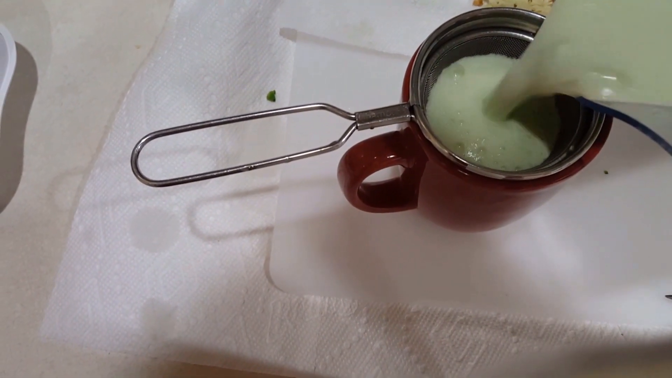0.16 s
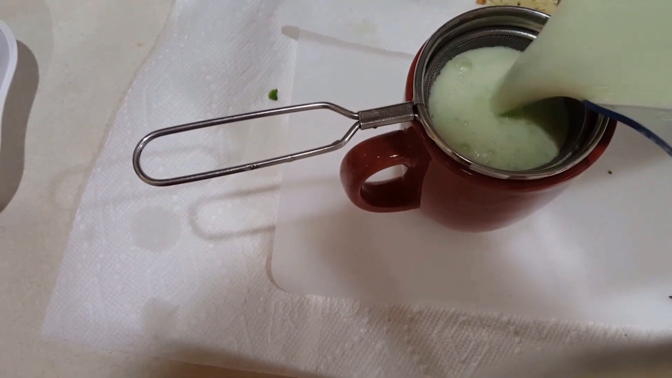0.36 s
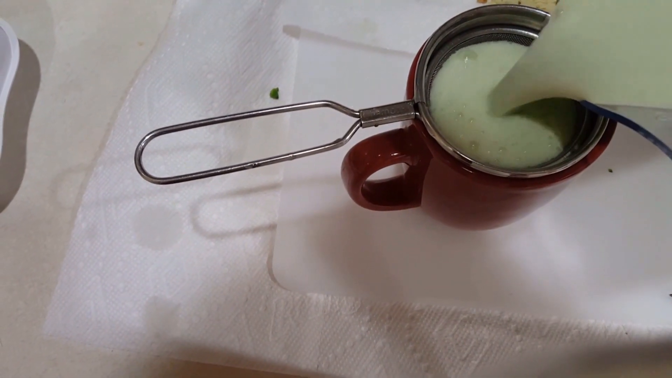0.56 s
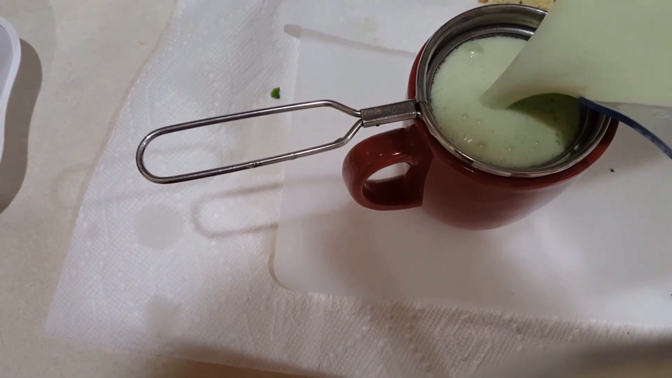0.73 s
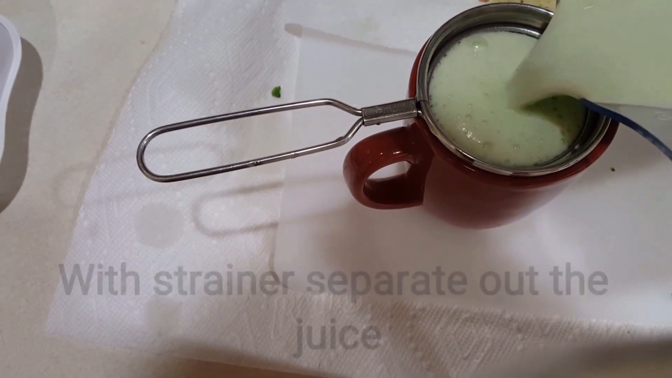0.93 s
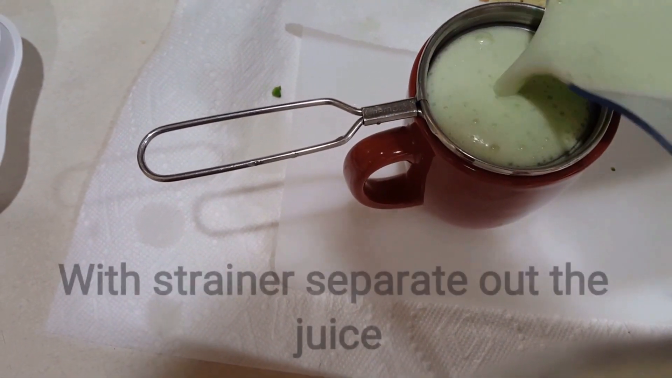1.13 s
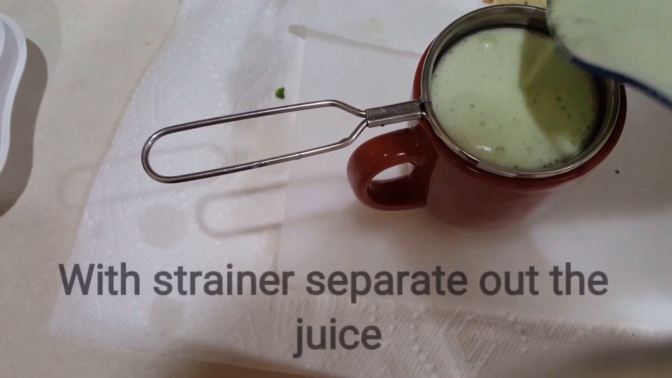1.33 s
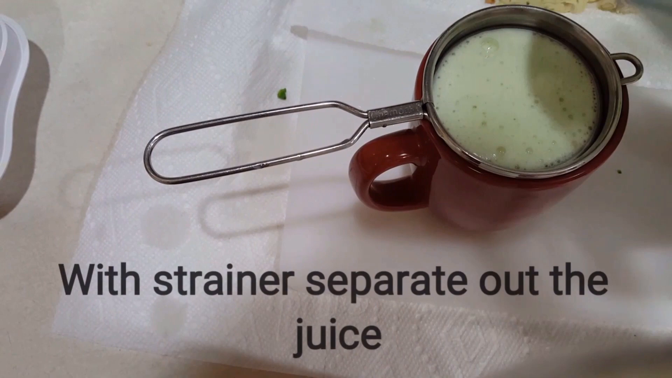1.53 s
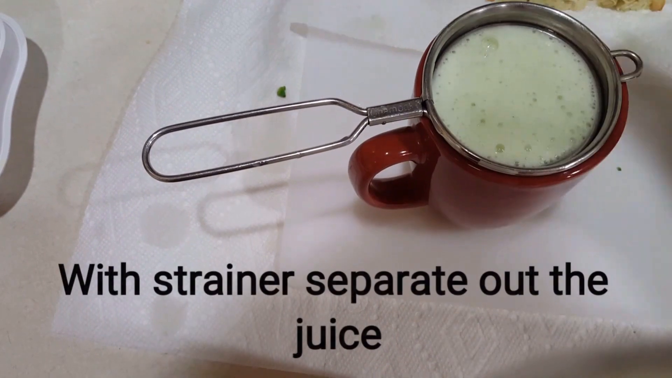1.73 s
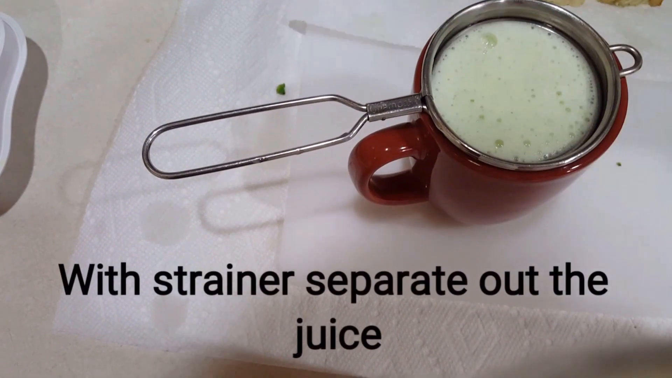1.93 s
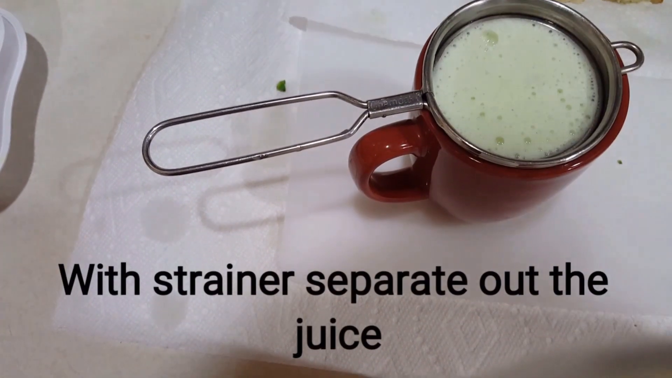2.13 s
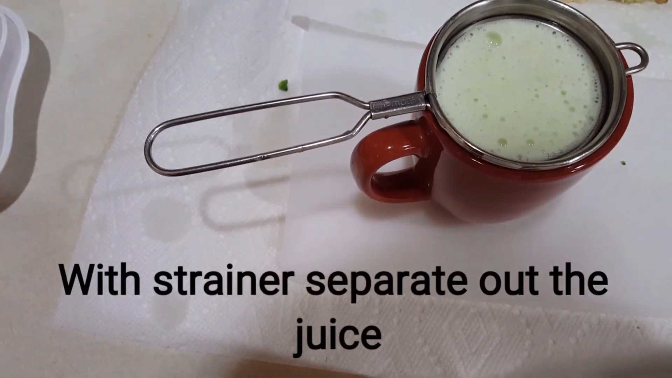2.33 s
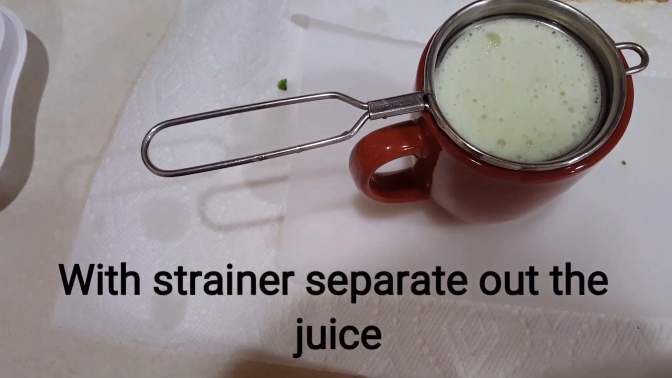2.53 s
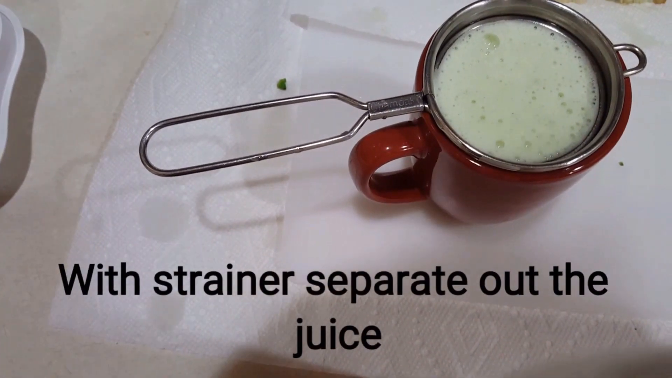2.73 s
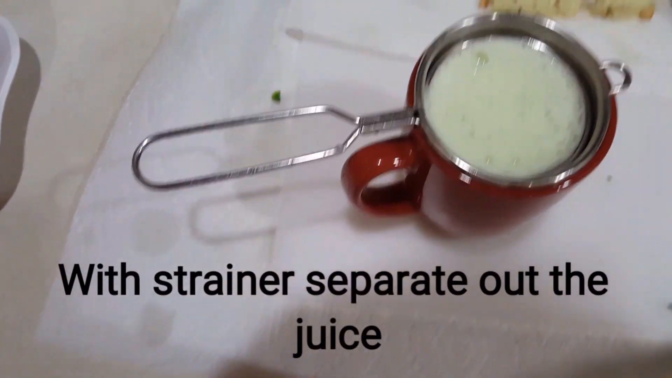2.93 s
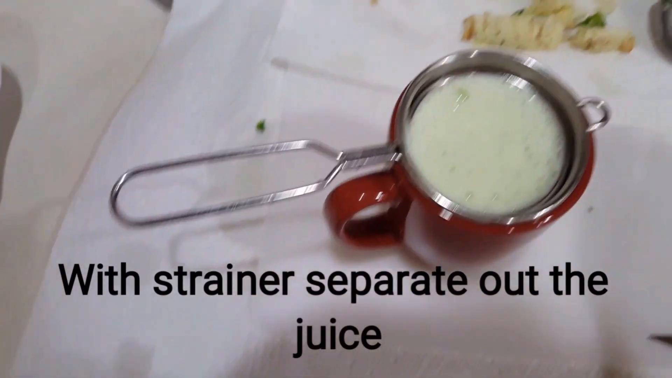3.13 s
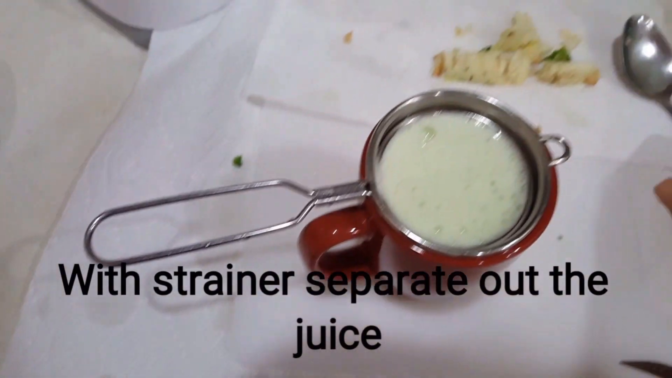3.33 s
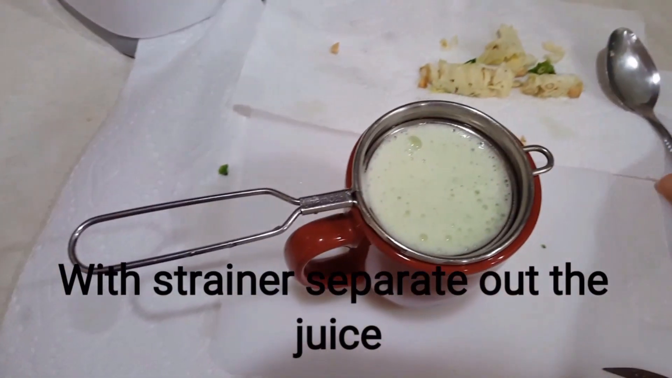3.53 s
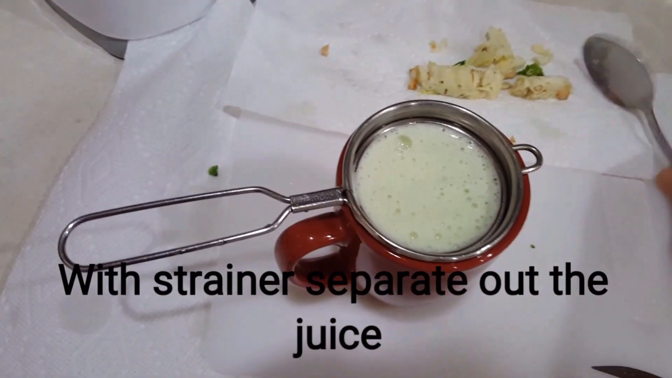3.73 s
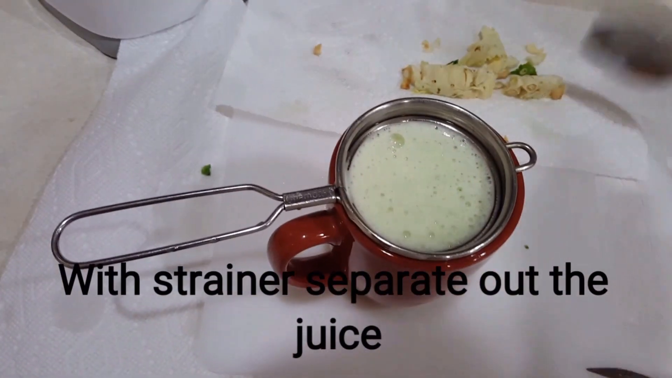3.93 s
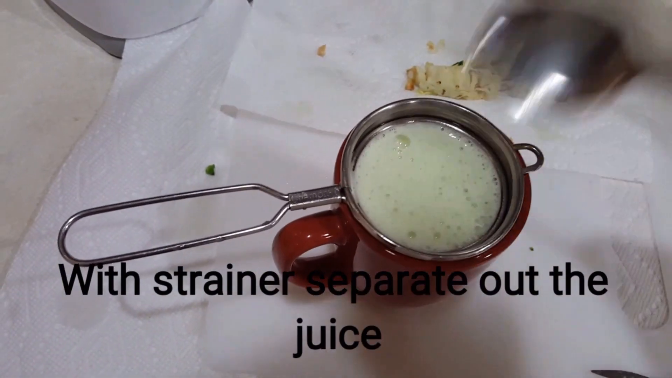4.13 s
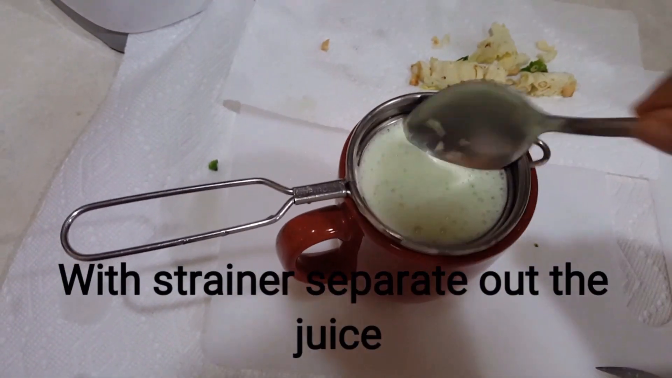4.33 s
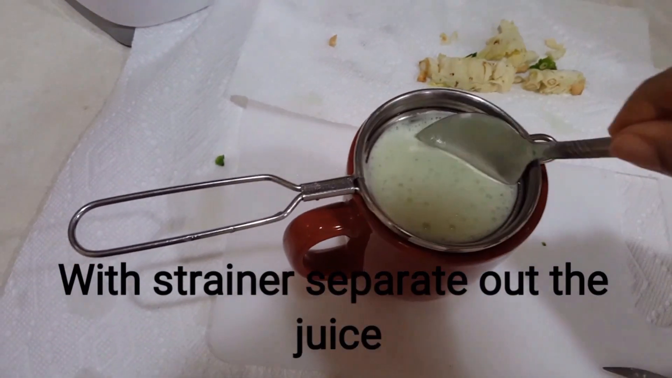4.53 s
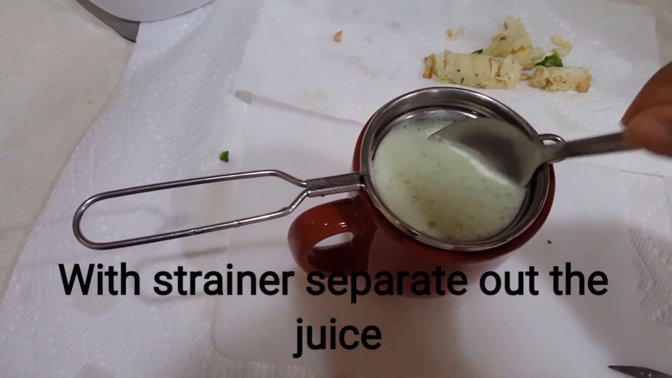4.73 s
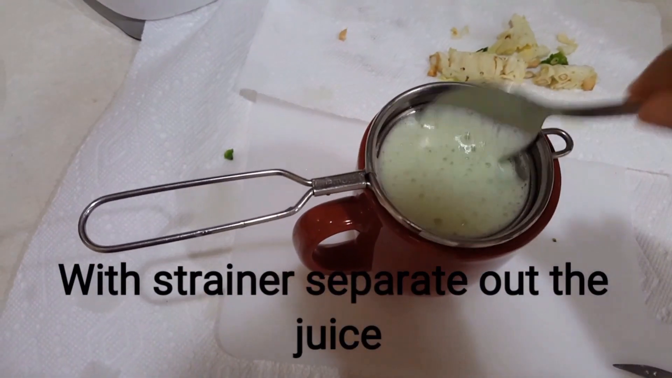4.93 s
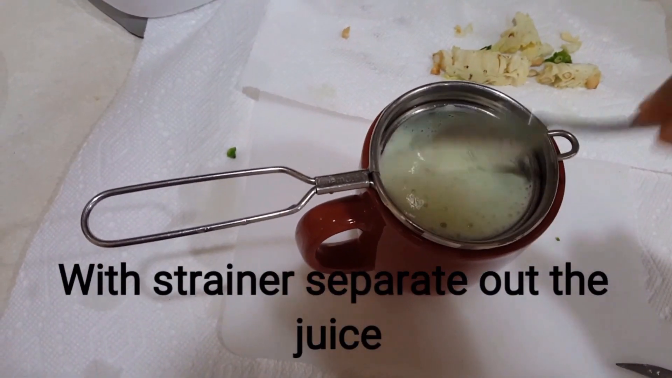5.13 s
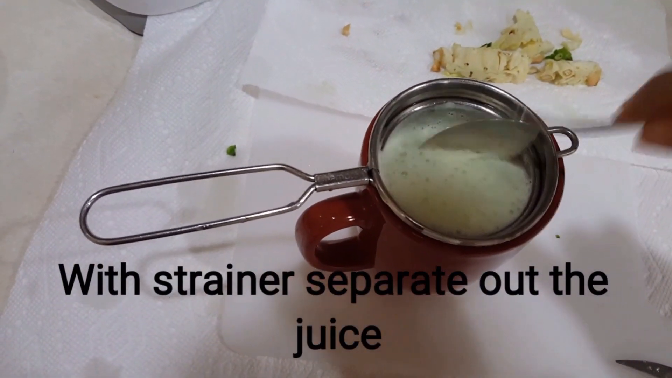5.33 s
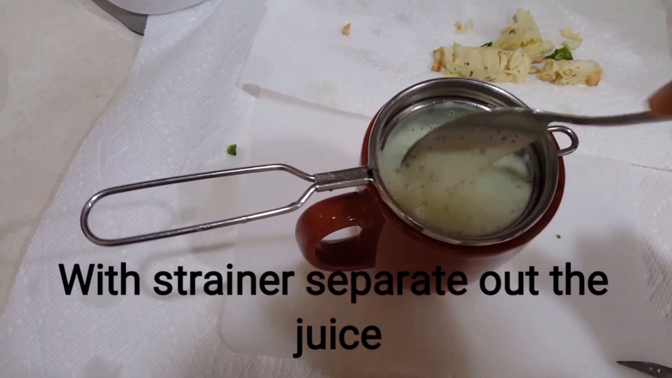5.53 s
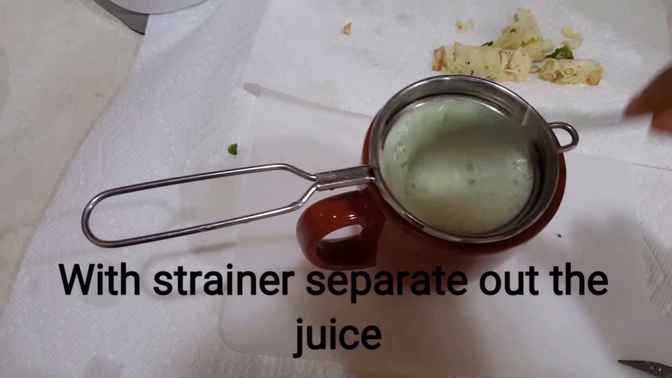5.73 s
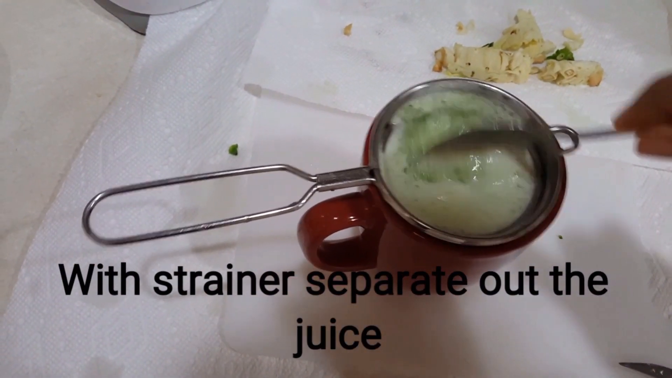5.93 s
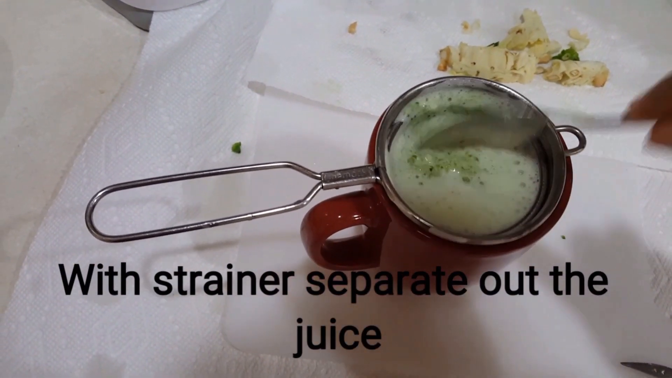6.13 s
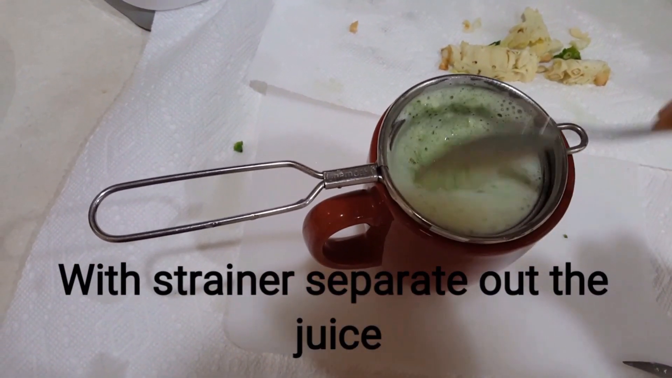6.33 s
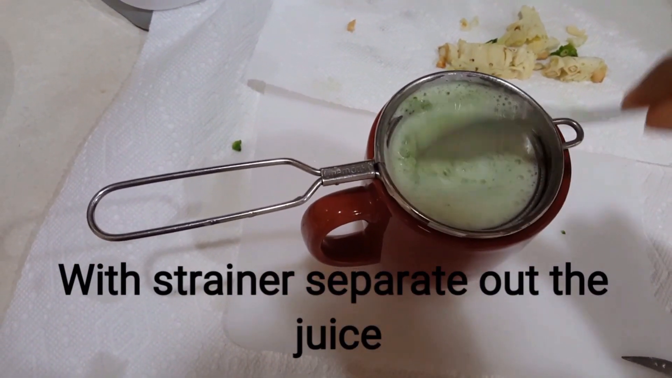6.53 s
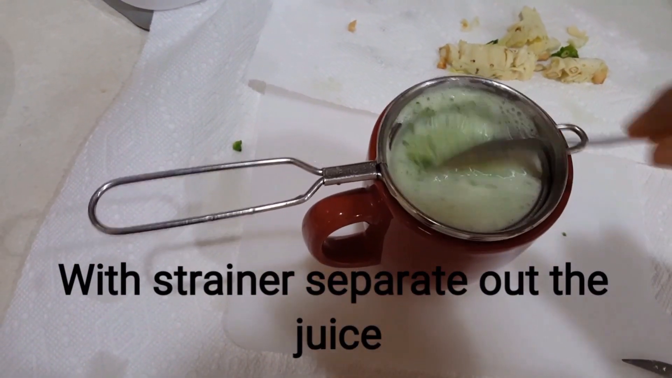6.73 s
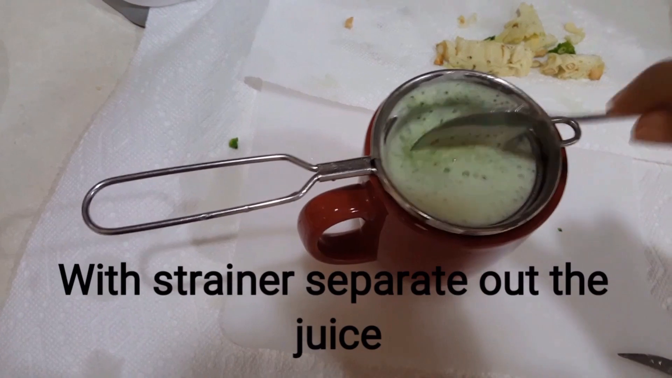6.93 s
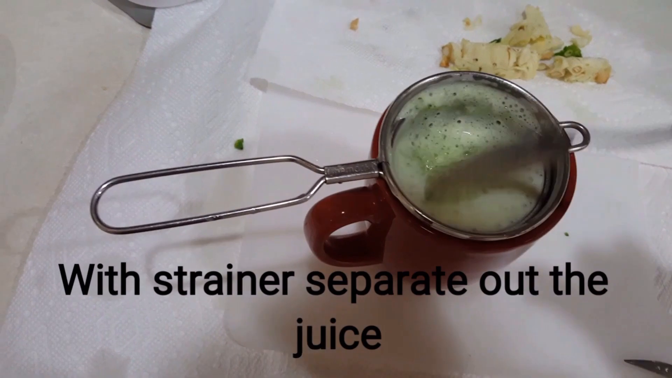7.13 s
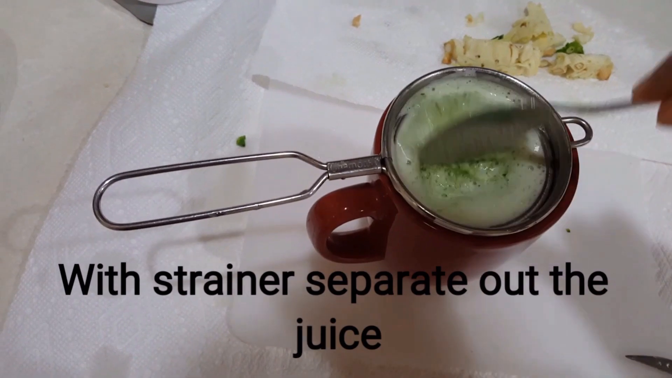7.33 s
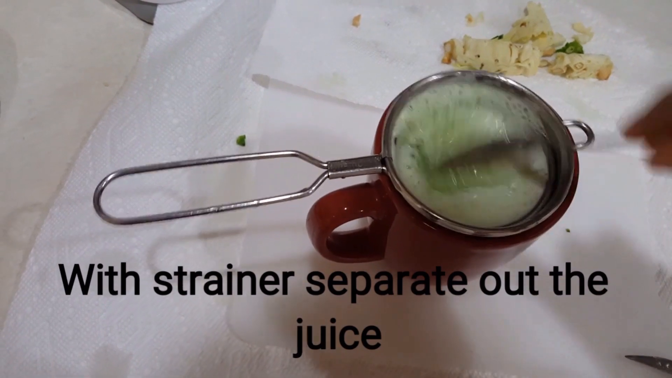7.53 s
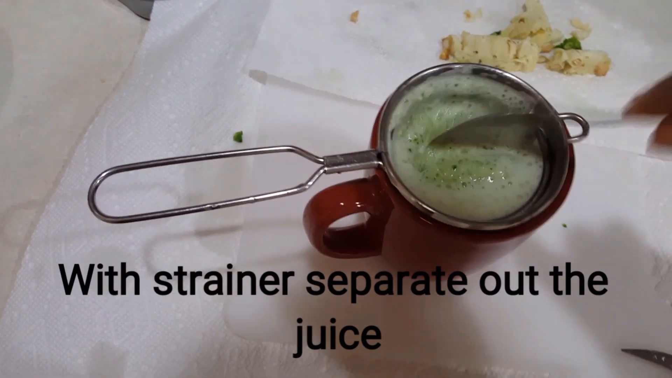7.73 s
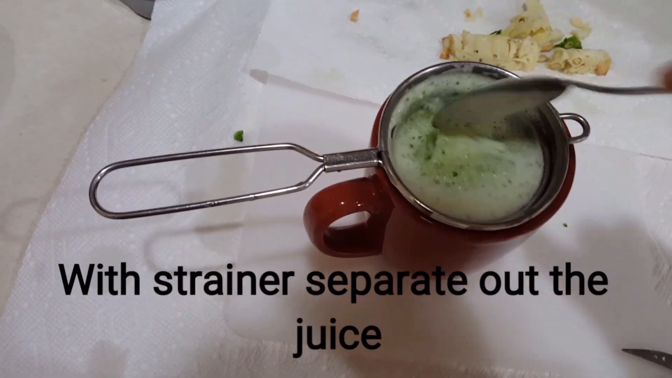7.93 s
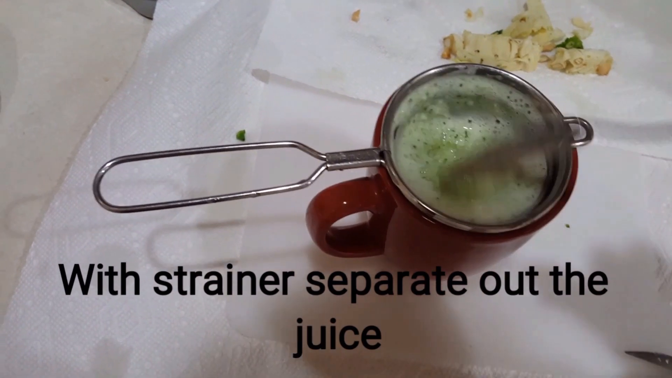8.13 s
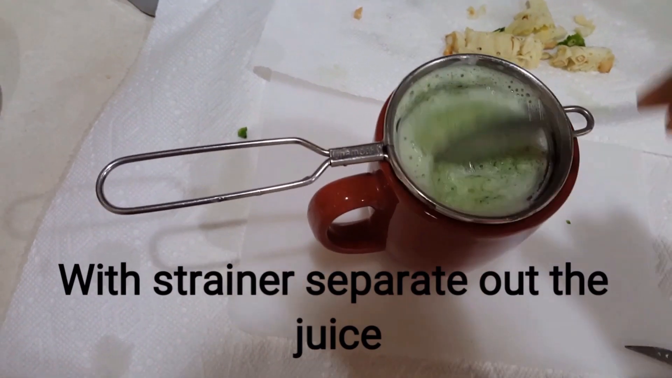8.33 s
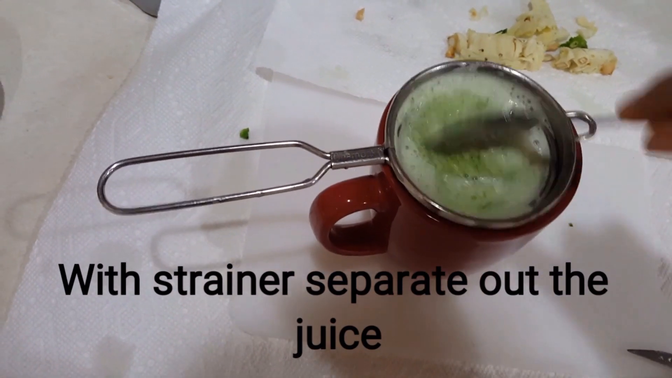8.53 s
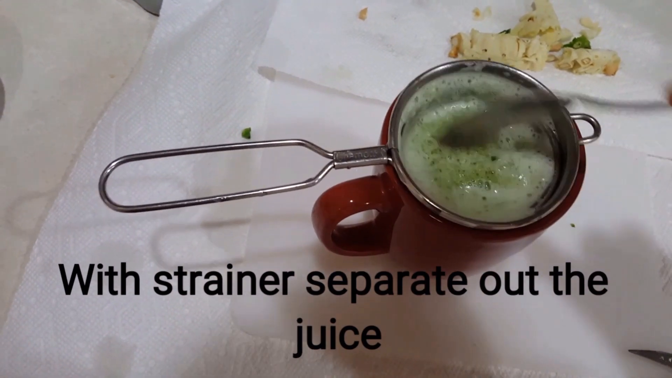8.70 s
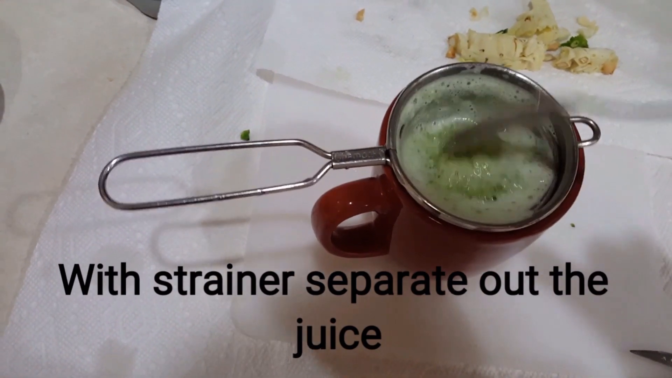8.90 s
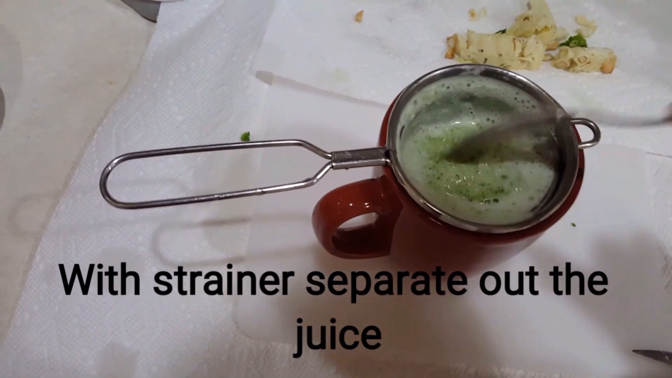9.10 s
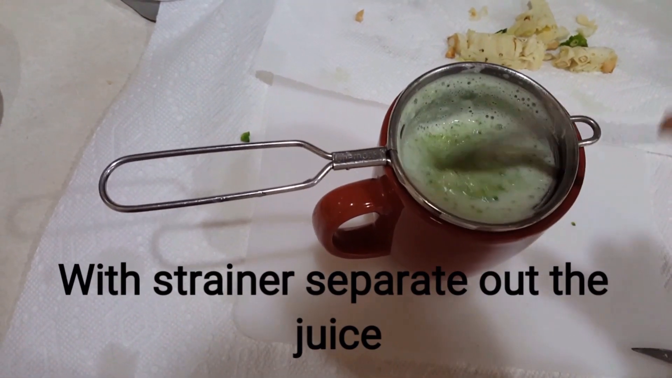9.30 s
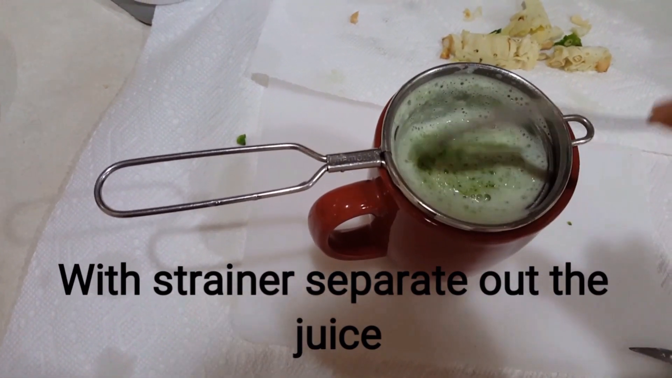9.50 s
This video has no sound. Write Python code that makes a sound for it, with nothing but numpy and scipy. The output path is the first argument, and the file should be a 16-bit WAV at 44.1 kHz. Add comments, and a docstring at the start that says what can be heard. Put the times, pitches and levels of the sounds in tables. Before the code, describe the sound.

Faint wet pouring, a dull double thud, small clinks, then a metal spoon knocks and scrapes rapidly on a wire strainer over a low hum.

```python
"""A spoon works green pulp through a wire strainer on a mug: each stab rings the wires as fading tones,
knocks the basket and shakes the table; between stabs the edge drags over the mesh as a run of tiny plucks.
Before that, pulp pours in as a soft hiss, the jug lands with a thud, paper towel rustles and the spoon
clinks as it is picked up. Air pops in the pulp as short rising tones; a fan motor hums in the small kitchen."""
import sys
import numpy as np
from scipy import signal
from scipy.fft import rfft, irfft, next_fast_len
from scipy.io import wavfile
from scipy.ndimage import uniform_filter1d

SR = 44100
rng = np.random.default_rng(int(sys.argv[2]) if len(sys.argv) > 2 else 0)


def transcribe(u):
    """Save the signal u as a 16-bit wav file named by the first command-line argument.

    u: samples, shape (n,) or (channels, n), limited to [-1, 1]; the rate is SR.
    q: integer samples, one column per channel.
    """
    v = np.clip(np.atleast_2d(u).T, -1, 1)
    q = np.round(v * 32767).astype(np.int16)
    wavfile.write(sys.argv[1], SR, q)


N = 426006
T = np.arange(SR // 2) / SR  # half a second of time [s], long enough for one contact
ATTACK = int(.012 * SR)  # the first 12 ms of a sound [samples], where its level is set

# In all tables, levels are settings that the functions may shift; decay is the time to fall by 60 dB. tones of
# the strainer wires, and above about 6 kHz the ring of the spoon: (frequency [Hz], level [dB], decay [s])
WIRES = [(1048, -14.5, 0.036), (1392, -9, 0.03), (1770, -30, 0.11), (2080, -5.5, 0.1), (2260, 11.5, 0.043),
         (2377, -9.5, 0.068), (2657, 2.5, 0.028), (2830, 1, 0.029), (2950, 2, 0.042), (3740, -12.5, 0.11),
         (4400, -5, 0.046), (4400, -35, 0.3), (5520, -12, 0.066), (5454, 6, 0.028), (6520, -9, 0.24),
         (9100, -45, .1), (8800, -26, 0.1), (10200, -8, 0.085), (12300, -17, 0.044)]
# tones of the table under the mug: (frequency [Hz], level [dB], decay [s])
TABLE = [(106, 6.5, 0.37), (114.77, 10, 0.41), (127, -1, 0.35)]
# spectrum of the contact noise of the mesh: (frequency [Hz], level [dB])
CRACK = [(700, -31), (1300, -14), (1800, 4.5), (2500, 5), (3100, 5), (3600, -9.5), (5500, -10.5),
         (7000, -8), (15000, -53)]
# spectrum of a sharp, bright contact: (frequency [Hz], level [dB])
TICK = [(1000, -43), (4000, 12.5), (6500, 4.5), (10000, 7.5), (11500, 2), (13500, 4), (15000, -9)]
# spectrum of slapped wet pulp: (frequency [Hz], level [dB])
SLAP = [(150, -17), (260, -20), (520, 0), (780, -16.5), (1060, 4), (1220, -5), (1400, -6), (1750, 0.5),
        (2300, -7.5), (6000, -32)]


def undb(db):
    """Turn decibels into gain."""
    return 10 ** (np.asarray(db) / 20)


def noise(size):
    """White noise."""
    return rng.standard_normal(size)


def fade(t60):
    """Exponential decay that falls by 60 dB in t60 seconds, over half a second."""
    return np.exp(-np.log(1000) * T / max(t60, 1e-3))


def along(points, size):
    """Read a table of (frequency [Hz], value) at the frequencies of a Fourier transform."""
    hz, value = np.transpose(points)[:2]
    return np.interp(np.log(np.fft.rfftfreq(size, 1 / SR) + 1), np.log(hz), value)


def colour(x, points):
    """Shape x by a spectrum of (frequency [Hz], level [dB]) and bring its rms to 1."""
    length = x.shape[-1]
    size = next_fast_len(length)
    spectrum = rfft(x, size) * undb(along(points, size))
    y = irfft(spectrum, size)[..., :length]
    return y / y.std()


def level(x, db, size=ATTACK):
    middle = x.mean(axis=0)[:size]
    return x * undb(db) / np.sqrt(np.mean(middle ** 2) + 1e-18)


def add(out, s, x):
    """Mix x in at time s."""
    i = int(s * SR)
    out[:, i:i + x.shape[1]] += x[:, :N - i]


def walk(rate):
    """Slow random drift with a spread a little under 1, heading for a new value rate times a second."""
    k = int(SR / rate)
    steps = np.repeat(noise(N // k + 1), k)
    return uniform_filter1d(steps, k)[:N]


def ringing(modes, drift=0):
    """Each tone swings and dies away, as a complex wave; drift detunes it a little at random."""
    tones = []
    for hz, db, t60 in modes:
        # pulp and spoon pressure detune the tones
        tuned_hz = hz + drift * np.sqrt(hz / t60) * rng.standard_normal()
        tones.append(undb(db) * fade(t60) * np.exp(2j * np.pi * tuned_hz * T))
    return np.array(tones)


def strike(body, scatter_db, spread):
    """Each contact point weights the tones anew; they reach left and right in slightly different phase."""
    weight, sign, left, right = noise((4, len(body)))
    gain = np.sign(sign) * undb(scatter_db * np.tanh(weight))
    swing = gain * np.exp(1j * spread * np.array([left, right]))
    return (swing @ body).real


def burst(points, t60, width):
    """Short contact noise that dies away; width sets how much of it differs left and right."""
    size = SR // 10
    hiss = colour(noise(size) + width * noise((2, size)), points)
    return hiss * fade(t60)[:size]


def soft(x, push):
    """A contact that lasts push seconds leaves out the treble."""
    press = signal.windows.hann(int(max(push, 1e-4) * SR) + 3)
    return signal.fftconvolve(x, press[None])[:, :x.shape[1]]


def chatter(x, span, follow, count=3):
    """The edge skips over a few more wires within span seconds of landing."""
    out = x.copy()
    for lag, size in rng.random((count, 2)):
        k = 1 + int(lag * span * SR)
        out[:, k:] += follow * size * x[:, :-k]
    return out


def thump(table, db):
    """The table takes a few cycles to get going under the mug."""
    shake = strike(table, scatter_db=5.5, spread=0.074) * (1 - fade(0.047))
    return level(shake, db, size=4 * ATTACK)


def fan():
    """The motor hums in steady tones that waver, with two breathy tones made by random drift."""
    # fan and mains tones: (frequency [Hz], level [dB], waver [share of the tone])
    hum_lines = [(44, -62, 0.036), (96, -60, .08), (120.4, -43, 0.01), (143, -55.5, 0.044),
                 (170, -62.5, 0.17), (200, -66.5, 0.34), (224, -74.5, 0.18), (460, -88.5, 0.39),
                 (467, -74.5, 0.76), (2730, -75, 0.32)]
    # breathy tones: (frequency [Hz], drift rate [Hz], level [dB])
    breathy = [(1352, 45, -76), (2710, 77, -80.5)]
    t = np.arange(N) / SR
    out = np.zeros(N)
    for hz, db, waver in hum_lines:
        sway = 1 + waver * (walk(4.6) + 1j * walk(15))
        out += undb(db) * (sway * np.exp(2j * np.pi * (hz * t + rng.random()))).real
    for hz, rate, db in breathy:
        sway = walk(rate) + 1j * walk(rate)
        out += undb(db) * (sway * np.exp(2j * np.pi * hz * t)).real
    return out


def room_air():
    """Broad noise whose level drifts, over a steady low rumble."""
    # spectrum of the air: (frequency [Hz], level [dB])
    air_spectrum = [(100, -20), (200, -11), (330, -4), (450, -15.5), (640, -12.5), (1300, -14),
                    (2000, -14.5), (2700, -16), (3100, -20), (4200, -18.5), (8000, -23), (14500, -30.5)]
    air_db = -64 + 1.9 * walk(4.04)
    air = undb(air_db) * colour(noise((2, N)) + 0.28 * noise(N), air_spectrum)
    # (frequency [Hz], level [dB])
    low = [(20, -13), (60, 6), (130, -4), (220, -9), (450, -10.5), (800, -36), (3000, -60)]
    rumble = undb(-62) * colour(noise(N) + 0.21 * noise((2, N)), low)
    return air + rumble


def pour():
    """The faint stream of pulp at the start: soft hiss whose level flutters."""
    # how loud the stream is: (time [s], level [dB])
    stream = [(0, -68.5), (.6, -69.5), (1.3, -73), (1.8, -75), (2.3, -97)]
    # spectrum of the stream: (frequency [Hz], level [dB])
    stream_spectrum = [(300, -16), (800, -25), (2000, -5), (4200, 5.5), (6500, 0), (9000, 1), (14000, -7)]
    stream_db = np.interp(np.arange(N) / SR, *np.transpose(stream)) + 3.4 * walk(12.0)
    return undb(stream_db) * colour(noise((2, N)), stream_spectrum)


def kitchen(x):
    """The room adds a short diffuse tail; its bass is alike left and right."""
    # echoes of the room, band by band: (frequency [Hz], level [dB], decay [s])
    bands = [(107, -5.5, 0.37), (333, -10.5, 0.54), (790, -7, 0.28), (2030, -12.5, 0.44), (5030, -9, 0.36),
             (11200, -7.5, 0.2)]
    size, tail = len(T), 0
    for k, (hz, db, t60) in enumerate(bands):
        share = along([(row[0], float(j == k)) for j, row in enumerate(bands)], size)
        apart = min(hz / 1100, 1)  # how far left and right differ
        echoes = np.sqrt(1 - apart) * noise(size) + np.sqrt(apart) * noise((2, size))
        echoes = echoes * fade(t60) * (1 - fade(0.017))
        echoes /= np.sqrt(np.sum(echoes ** 2) / 2)
        tail = tail + undb(db) * irfft(rfft(echoes) * np.sqrt(share), size)
    tail = tail * np.minimum(1, 20 * (T[-1] - T))  # ends without a step
    return x + signal.fftconvolve(x, tail, axes=1)[:, :N]


def pops():
    """Air pockets burst in the pulp: a few cycles gliding upward, with a snap that is stronger in high ones."""
    # pops: (time [s], starting pitch [Hz], level [dB])
    bubbles = [(.08, 460, -59), (.46, 1500, -60.5), (1.538, 475, -57), (4.6516, 2020, -64.5),
               (5.0095, 1420, -37.5), (5.0408, 1540, -57), (5.343, 1800, -60), (6.6228, 1550, -56.5)]
    out = np.zeros((2, N))
    for s, hz, db in bubbles:
        bubble = np.sin(2 * np.pi * hz * (T + 3 * T ** 2)) * fade(20000.0 / hz ** 2)
        add(out, s, level(np.array([bubble, bubble]), db - 3.5))
        snap = burst(SLAP, t60=0.011, width=0.34)
        add(out, s, level(snap, db + 7 * np.log2(hz / 1400)))
    return out


def jug():
    """The jug thuds onto the table, one edge and then the other, and the table rattles dully for a moment."""
    # the edges land: (time [s], level [dB])
    landings = [(2.4095, -13.5), (2.4300, -13)]
    # tones of the table under the jug: (frequency [Hz], level [dB], decay [s])
    tabletop = [(113, -19, 0.26), (219, -6, 0.087), (246, -6.5, 0.042), (308.7, 4.5, 0.089),
                (341.4, -13, 0.18), (520, -7, 0.13), (637, -40, 0.089), (760, -12, 0.13)]
    # spectrum of the dull rattle: (frequency [Hz], level [dB])
    rattle_spectrum = [(50, -32), (150, -13.5), (300, 5.5), (520, 3), (800, -11), (1300, -18.5),
                       (3500, -31), (8000, -39), (15000, -60)]
    # spectrum of the hard edge: (frequency [Hz], level [dB])
    clack_spectrum = [(300, -4), (1200, 12.5), (1800, -8), (2800, 5), (4500, -5.5), (8000, -33),
                      (15000, -50)]
    out = np.zeros((2, N))
    thud = soft(ringing(tabletop).real.sum(axis=0)[None], push=0.0031)
    # the thud carries little below 95 Hz
    thud = signal.sosfilt(signal.butter(2, 95, "high", fs=SR, output="sos"), thud)
    for s, db in landings:
        add(out, s, level(thud, db))
    last_s, last_db = landings[-1]  # the second edge lands hard and starts the rattle
    size = len(T)
    rattle = colour(noise(size) + 1.5 * noise((2, size)), rattle_spectrum) * fade(0.43)
    add(out, last_s, level(rattle, last_db - 18))
    add(out, last_s, level(burst(clack_spectrum, t60=0.017, width=0.52), last_db - 21.5))
    return out


def rustles():
    """The paper towel rustles under the hand and the spoon: its fibres crinkle in short swells."""
    # swells: (time [s], length [s], level [dB])
    swells = [(2.918, .16, -65), (3.159, .1, -66), (3.66, .22, -63)]
    # spectrum of the paper: (frequency [Hz], level [dB])
    paper = [(300, -3), (700, 0.5), (1400, 1), (2200, -6.5), (4000, -14.5), (8000, -18.5), (14000, -24)]
    crinkles_per_s = 900
    out = np.zeros((2, N))
    for s, length, db in swells:
        size = int(length * SR)
        happens = rng.random(len(T)) < crinkles_per_s / SR
        crinkles = happens * (noise(len(T)) + 0.64 * noise((2, len(T))))
        swell = colour(crinkles, paper)[:, :size] * signal.windows.hann(size)
        add(out, s, level(swell, db, size=size))
    return out


def bumps():
    """Soft handling bumps build up gently and reach the table."""
    # bumps: (time [s], bump level [dB], table thump level [dB])
    touches = [(3, -25.5, -54), (3.055, -38, -46.5), (3.13, -36, -62), (3.194, -40, -66),
               (3.239, -41.5, -60), (3.335, -44, -59), (3.412, -39.5, -46), (3.452, -42, -39),
               (3.675, -40.5, -53), (3.723, -41.5, -55), (3.792, -44.5, -47)]
    # tones of a soft bump: (frequency [Hz], level [dB], decay [s])
    handled_modes = [(197.7, 0.5, 0.073), (246, -11.5, 0.073), (326, -2, 0.073), (454, -12.5, 0.022)]
    out = np.zeros((2, N))
    handled, table = ringing(handled_modes), ringing(TABLE)
    for s, db, thump_db in touches:
        bump = strike(handled, scatter_db=3.5, spread=0.2) * (1 - fade(0.011))
        add(out, s, level(soft(bump, push=.0013), db))
        add(out, s, thump(table, thump_db))
    return out


def clinks():
    """Light hard contacts as the spoon is picked up: a dry click, a tick and the ring of the loose spoon."""
    # contacts: (time [s], click level [dB])
    touches = [(2.6306, -57.5), (2.842, -60), (2.9218, -58), (2.9464, -53.5), (3.41, -50.5), (3.4426, -50),
               (3.5523, -54.5), (3.6694, -61), (3.7237, -40.5), (3.755, -62), (3.83, -59), (3.85, -58.5)]
    # spectrum of a dry hard contact: (frequency [Hz], level [dB])
    click_spectrum = [(300, 9), (1000, 1), (1800, 6), (3000, -1), (4500, -2.5), (8000, -16), (15000, -45)]
    # tones of the loose spoon: (frequency [Hz], level [dB], decay [s])
    spoon_modes = [(1620, 0, 0.081), (2150, -2.5, 0.15), (3100, -11, 0.06), (3510, -1, 0.065),
                   (4530, -13, 0.09), (5600, -1, 0.028), (7160, 0, 0.026), (8310, -3.5, 0.097),
                   (10500, -6, .025), (13500, -1, .015)]
    out = np.zeros((2, N))
    spoon = ringing(spoon_modes)
    for s, click_db in touches:
        add(out, s, level(burst(click_spectrum, t60=0.021, width=1.0), click_db))
        add(out, s, level(burst(TICK, t60=0.099, width=0.99), click_db - 10.5))
        add(out, s, level(strike(spoon, scatter_db=10, spread=1.0), click_db - 4))
    return out


def rim_taps():
    """The spoon bowl meets the rim as it goes in: a short ring that chatters."""
    # taps: (time [s], level [dB])
    taps = [(4.3493, -32.5), (4.48, -40.5), (4.543, -47)]
    # tones of the rim: (frequency [Hz], level [dB], decay [s])
    rim_modes = [(4150, 6.5, 0.019), (4560, -1, 0.026), (5340, 4, 0.012), (5570, 7, 0.017),
                 (5900, -8, 0.018), (7000, -9, .025)]
    out = np.zeros((2, N))
    rim = ringing(rim_modes)
    for s, db in taps:
        tap = chatter(strike(rim, scatter_db=2, spread=.5), span=.004, follow=0.5)
        add(out, s, level(tap, db))
    return out


def basket_at(s):
    """Tones of the basket and the air under it at time s; juice filling that space raises the pitch."""
    # tones before the pitch ratio: (frequency [Hz], level [dB], decay [s])
    basket_modes = [(344.2, -7, 0.083), (378.4, 0.5, 0.097), (435.5, -3.5, 0.054), (470.2, -4.5, 0.063),
                    (584.6, -19, 0.15)]
    # rise in pitch: (time [s], pitch ratio [1])
    filling = [(4.3, 0.91), (6.5, .95), (8.0, 1.014), (9.4, 1.058)]
    ratio = np.interp(s, *np.transpose(filling))
    return ringing([(hz * ratio, db, t60) for hz, db, t60 in basket_modes], drift=0.1)


def drags():
    """The edge plucks wire after wire through the pulp; the plucks ring the strainer and thump the table."""
    # drags: (time [s], length [s], rasp level [dB], wet rub level [dB], table thump level [dB])
    strokes = [(4.405, 0.096, -57, -57, -70), (4.689, 0.11, -66, -66, -65), (5.033, 0.041, -57.5, -72, -52),
               (5.5, 0.039, -53, -49, -38.5), (5.719, 0.032, -45, -45, -37), (5.953, 0.027, -47, -47, -60),
               (6.498, 0.033, -54.5, -52, -40.5), (7.282, 0.057, -46, -42, -42),
               (7.54, 0.012, -58, -62, -41), (7.594, 0.019, -49.5, -52, -37),
               (8.059, 0.02, -41, -40.5, -58), (8.315, .095, -43, -55, -43), (8.544, .02, -52, -54, -46),
               (8.631, 0.044, -51, -45, -48)]
    plucks_per_s = 1500
    out = np.zeros((2, N))
    wires, table = ringing(WIRES), ringing(TABLE)
    for s, length, rasp_db, rub_db, thump_db in strokes:
        size = int(length * SR)
        plucks = (rng.random(len(T)) < plucks_per_s / SR) * noise(len(T))
        plucks = plucks[None, :size] * signal.windows.tukey(size, .5)
        rasp = level(burst(CRACK, t60=0.013, width=0.17), 0)
        rasp = rasp + level(burst(TICK, t60=0.0089, width=0.47), 1.5)
        ring = strike(wires, scatter_db=5, spread=0.6)
        rub = burst(SLAP, t60=0.0072, width=0.13)
        knock = soft(strike(basket_at(s), scatter_db=2.0, spread=0.14), push=0.0016)
        # every pluck sets off each of these answers
        answers = [(rasp, rasp_db - 5), (ring, rasp_db - 17), (rub, rub_db), (knock, rasp_db + 2)]
        for answer, db in answers:
            add(out, s, level(signal.fftconvolve(plucks, answer), db, size=size))
        add(out, s, thump(table * fade(0.3), thump_db))
    return out


def grit(rate, t60):
    """Tiny slips over the mesh, rate of them a second, die away after a stab."""
    size = SR // 10
    slips = (rng.random(size) < rate / SR) * noise(size) * fade(t60)[:size]
    answer = level(burst(CRACK, t60=0.0036, width=0.82), 0)
    answer = answer + level(burst(TICK, t60=0.0065, width=0.68), -10.0)
    return signal.fftconvolve(slips[None], answer)[:, :size]


def graze(s, ring_db):
    """A touch through pulp: ring and knock nearly alike, hardly any tick or thump."""
    knock_db, tick_db, thump_db = ring_db - 1, ring_db - 16, ring_db - 16
    return s, ring_db, knock_db, tick_db, thump_db


def stab(s, ring_db, knock_db):
    """A blow on bare mesh: tick and thump follow from how hard it rings and knocks."""
    nominal_db = -33  # a stab that rings and knocks at this setting ticks at -38.5 dB
    # the tick grows more slowly than ring or knock
    tick_db = -38.5 + 0.39 * (ring_db - nominal_db) + 0.29 * (knock_db - nominal_db)
    thump_db = (ring_db + knock_db) / 2 - 12.5
    return s, ring_db, knock_db, tick_db, thump_db


def contacts():
    """Every touch of the spoon: (time [s], ring [dB], knock [dB], tick [dB], thump [dB])."""
    # stabs through to the mesh: (time [s], ring level of the wires [dB], knock level of the basket [dB])
    blows = [(4.349, -32, -28.5), (4.454, -50, -39.5), (4.4805, -40.5, -36), (4.9159, -32, -35.5),
             (5.078, -41, -36), (5.187, -34, -37), (5.3825, -37.5, -44), (5.6124, -30.5, -37.5),
             (5.940, -38, -35), (6.1105, -30, -36), (6.226, -32, -32.5), (6.247, -31, -32.5),
             (6.3592, -29.5, -33), (6.7715, -39, -34.5), (6.916, -26.5, -32.5), (7.0027, -35, -28.5),
             (7.021, -33, -30), (7.1495, -26.5, -29.5), (7.5913, -42, -33.5), (7.725, -28.5, -32.5),
             (7.819, -30, -25), (7.8406, -33, -32.5), (7.965, -26, -30.5), (8.0515, -31, -29.5),
             (8.088, -38.5, -31), (8.18, -37.5, -43), (8.3048, -25, -33.5), (8.613, -46, -35),
             (8.6619, -38, -41.5), (8.7649, -27.5, -31), (8.8487, -30.5, -25.5), (8.8632, -37, -30),
             (8.995, -26.5, -29), (9.0974, -27, -20.5), (9.115, -37.5, -29), (9.2088, -31, -33.5),
             (9.325, -23.5, -24.5)]
    # touches of the basket cushioned by pulp: (time [s], ring level [dB])
    touches = [(4.5421, -45), (4.8335, -52.5), (5.3076, -46), (5.5, -45), (5.584, -39.5), (5.717, -39),
               (6.0587, -45.5), (6.288, -43), (6.8255, -36.5), (7.0776, -41.5), (7.275, -44.5),
               (7.6352, -36.5), (7.884, -40), (8.114, -41), (8.173, -39), (8.3268, -32), (8.410, -41),
               (8.641, -39), (8.910, -36.5), (9.142, -41), (9.1773, -42), (9.3968, -44.5), (9.563, -46)]
    hard_db, slant_db = -29, 1.5
    lead_ins = []
    for s, ring_db, knock_db in blows:
        # a hard stab that rings clearly more than it knocks comes in along the side and grazes it first
        if ring_db > max(hard_db, knock_db + slant_db):
            lead_ins.append((s - .02, ring_db - 19))
    return [stab(*row) for row in blows] + [graze(*row) for row in touches + lead_ins]


def stabs():
    """The spoon grazes or hits the mesh: wires ring, pulp slaps, the basket knocks, the table thumps."""
    out, table = np.zeros((2, N)), ringing(TABLE)
    states = [ringing(WIRES, drift=.13) for _ in range(14)]  # slightly different tunings
    octaves = np.log2(np.array(WIRES)[:, :1] / 2265)
    for s, ring_db, knock_db, tick_db, thump_db in contacts():
        wires, basket = states[rng.integers(len(states))], basket_at(s)
        # a stab cushioned by pulp favours the low tones
        hardness = np.clip(tick_db - ring_db + 4, -15, 3)
        ring = strike(wires * undb(0.42 * hardness * octaves), scatter_db=6, spread=0.62)
        knock = soft(strike(basket, scatter_db=2, spread=0.15), push=0.0013)
        # faint noise starts just ahead of the main contact
        add(out, s - .004, level(burst(CRACK, t60=0.12, width=0.7), ring_db - 18.5))
        add(out, s - .003, level(burst(TICK, t60=0.059, width=1.0), tick_db - 17.0))
        add(out, s, level(chatter(ring, span=0.0073, follow=0.42), ring_db - 2.5))
        add(out, s, level(burst(CRACK, t60=0.048, width=0.84), ring_db - 9.5))
        add(out, s, level(burst(TICK, t60=0.026, width=1.0), tick_db - .5))
        add(out, s, level(burst(SLAP, t60=0.044, width=0.22), knock_db - 9))
        add(out, s, level(knock, knock_db - .3))
        add(out, s + .005, level(grit(rate=450, t60=0.069), ring_db - 21.5, size=4 * ATTACK))
        add(out, s, thump(table, thump_db))
    return out


def scene():
    """All sounds at the table ring in the room, over the fan, the air and the stream."""
    background = fan() + room_air() + pour()
    hands = jug() + rustles() + bumps() + clinks() + rim_taps()
    return background + kitchen(pops() + hands + drags() + stabs())


def record(dry):
    """Two microphone ports with their own colour, the left a little further off; deep bass and top are cut."""
    # difference between the ports: (frequency [Hz], left minus right [dB])
    tilt = [(60, 4), (120, -2.04), (350, -0.5), (950, -0.5), (1400, -7), (2250, -3), (3000, -4.5),
            (5400, -4), (6600, 1), (8500, -0.5), (12000, 4.5)]
    size = next_fast_len(N + SR // 10)
    hz, tilt_db = np.fft.rfftfreq(size, 1 / SR), along(tilt, size)
    left = undb(tilt_db / 2) * np.exp(-2j * np.pi * hz * 2.2e-5)  # 22 microseconds later
    right = undb(-tilt_db / 2)
    heard = irfft(rfft(dry, size) * np.array([left, right]), size)[:, :N]
    heard = signal.sosfilt(signal.butter(2, 42, "high", fs=SR, output="sos"), heard)
    return signal.sosfilt(signal.ellip(8, .2, 70, 14650, fs=SR, output="sos"), heard)


dry = scene()
out = record(dry)
transcribe(out)
```